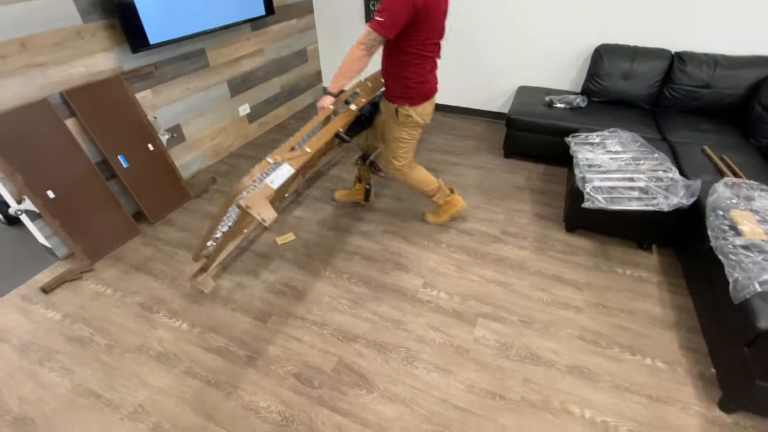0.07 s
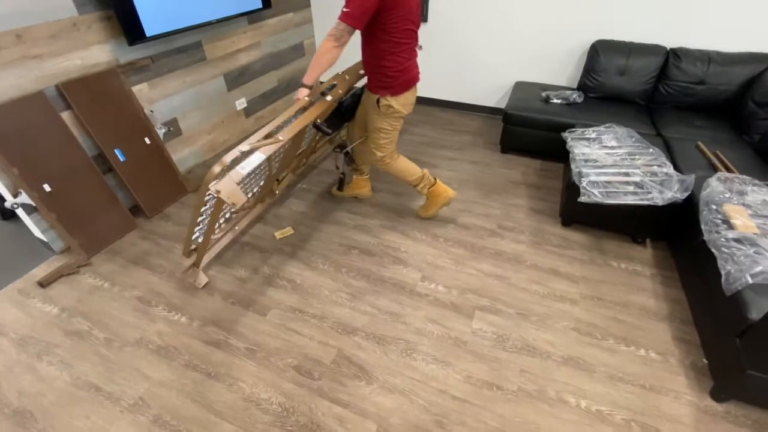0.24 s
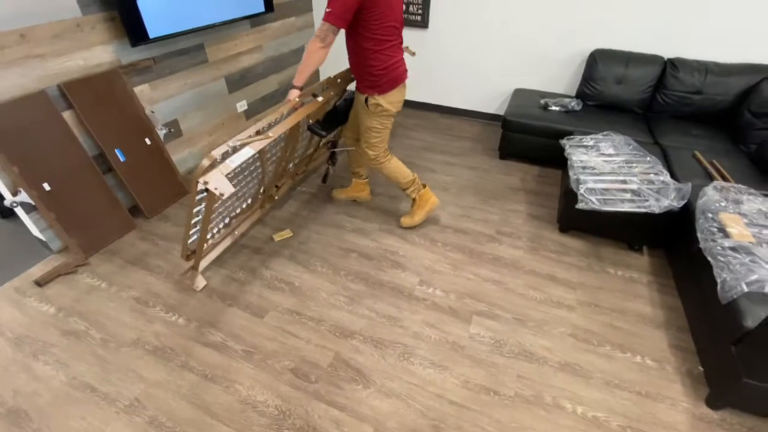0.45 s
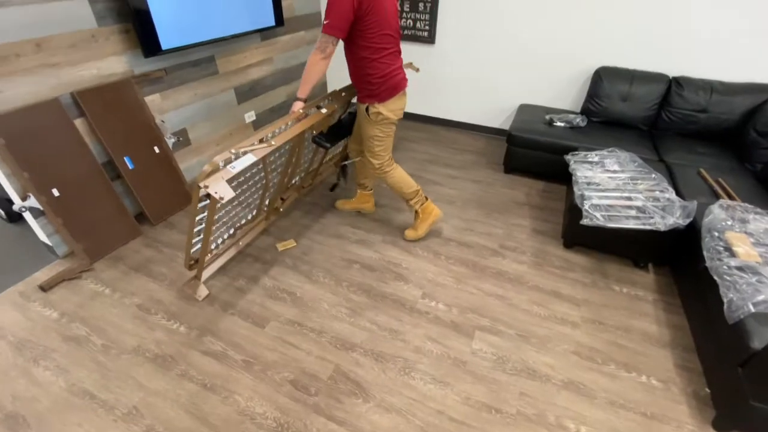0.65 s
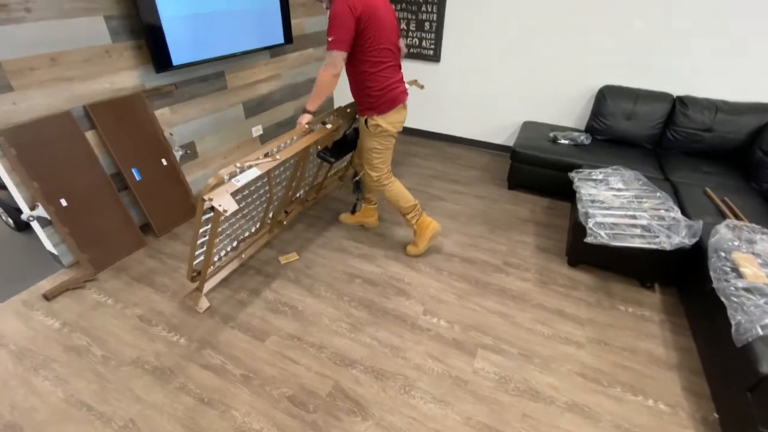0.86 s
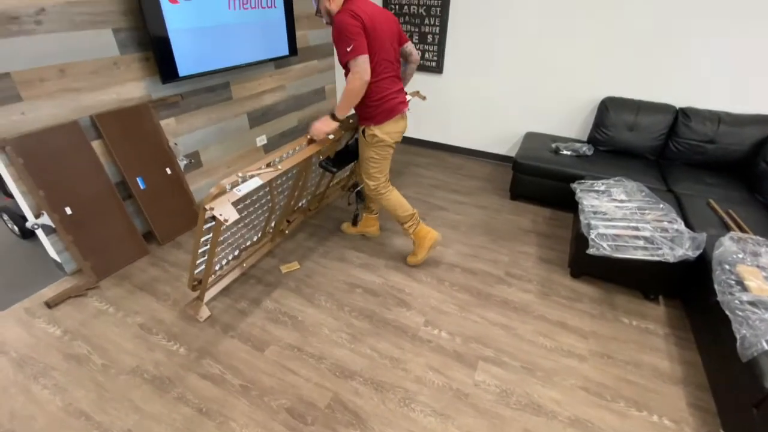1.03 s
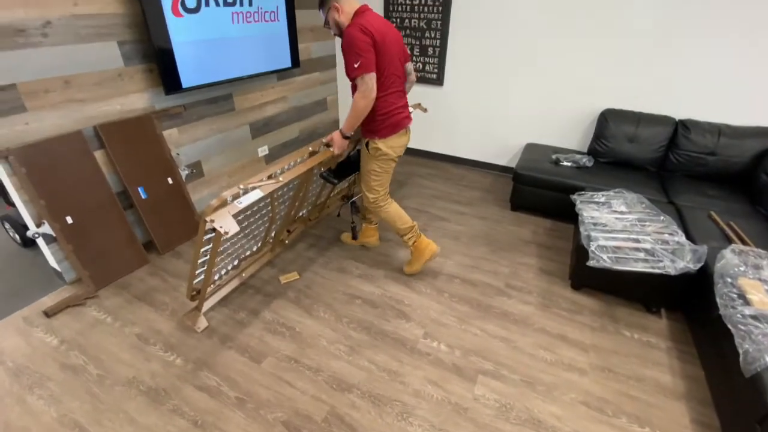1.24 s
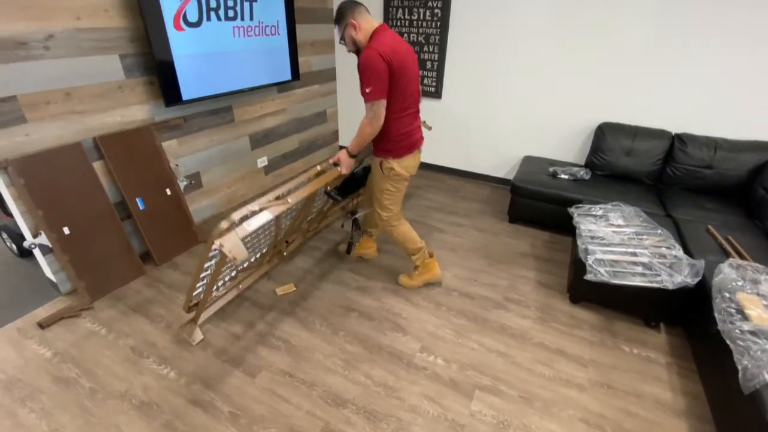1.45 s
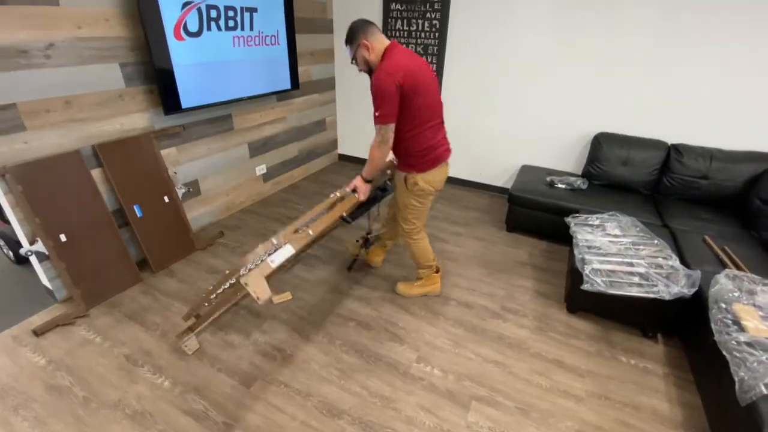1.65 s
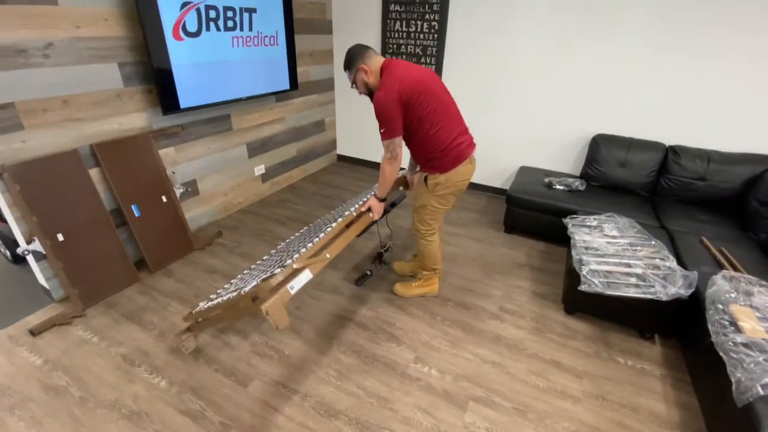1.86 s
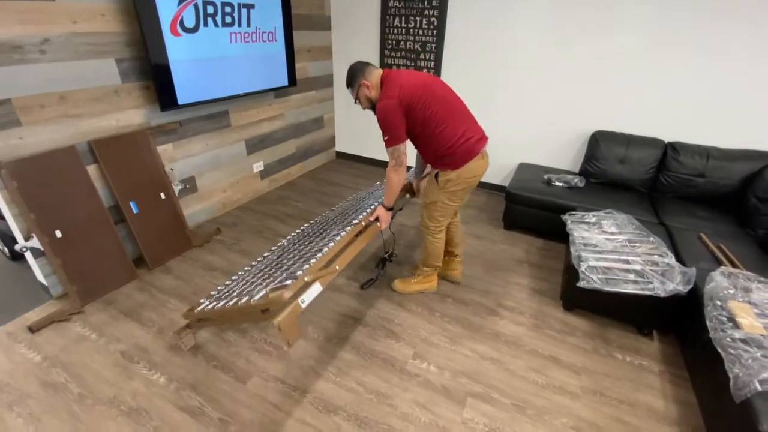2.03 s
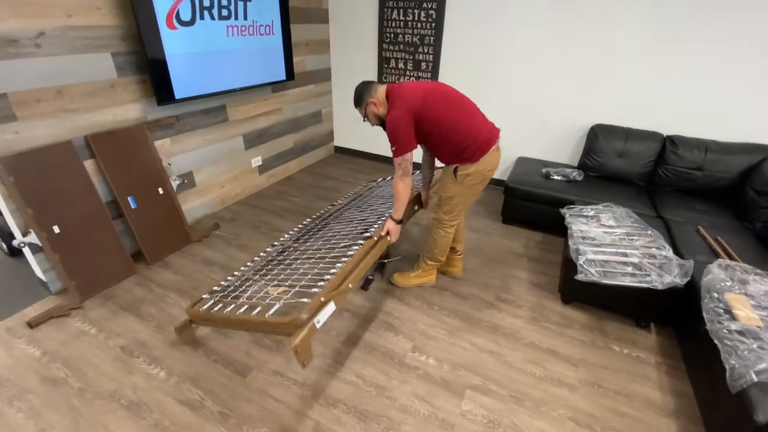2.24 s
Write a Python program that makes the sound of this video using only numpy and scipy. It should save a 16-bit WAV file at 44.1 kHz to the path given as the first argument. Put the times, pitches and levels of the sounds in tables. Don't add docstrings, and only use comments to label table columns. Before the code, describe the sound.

Steel bed frame handled indoors: a sharp, bright clash of springs and latch, scattered knocks and dull floor thuds, a brief quiet, then chattering links and a final leg knock, picked up in stereo in a lightly reverberant room.

```python
import sys
import numpy as np
from scipy import signal
from scipy.fft import rfft, irfft, next_fast_len
from scipy.io import wavfile
from scipy.ndimage import uniform_filter1d

SR = 44100
rng = np.random.default_rng(int(sys.argv[2]) if len(sys.argv) > 2 else 0)


def bounce(signal):
    frames = np.transpose(np.atleast_2d(signal))
    limited = np.clip(frames, -1, 1)
    pcm = np.round(limited * 32767).astype(np.int16)
    wavfile.write(sys.argv[1], SR, pcm)


def attenuation_scalar(level_db):
    decades = np.asarray(level_db, float) / 20
    return 10 ** decades


N = 101429


def along(table, hz):
    table = np.array(table, float)
    return np.interp(np.log(np.maximum(hz, 1)), np.log(table[:, 0]), table[:, 1])


def unit(x):
    return x / np.sqrt(np.sum(x ** 2) + 1e-18)


def add(track, at_s, sound):
    i = int(at_s * SR)
    track[i:i + len(sound)] += sound[:N - i]


def highpass(x, cutoff_hz):
    return signal.sosfilt(signal.butter(2, cutoff_hz, "high", fs=SR, output="sos"), x)


def rings(hz, t60_s):
    t = np.arange(int(min(t60_s.max() * 0.8, 0.2) * SR)) / SR
    fade = np.exp(-np.log(1000) * t / np.clip(t60_s, 0.005, 0.25)[:, None])
    return np.sin(2 * np.pi * np.outer(hz, t)) * fade


# pitch_hz, level_db (per Hz)
AIR_SPECTRUM = [(18, -55), (30, 0.5), (82, 2.5), (138, -4.5), (229, 2), (428, -6.5), (1790, -26),
                (2020, -24), (12000, -43.5), (15700, -33), (16300, -100)]


def air():
    hz, out = np.fft.rfftfreq(N, 1 / SR), np.zeros(N)
    shape = attenuation_scalar(along(AIR_SPECTRUM, hz))
    shape /= np.sqrt(np.mean(shape ** 2))
    for low_hz in 36 * 2.0 ** np.arange(9):
        steps = np.repeat(rng.standard_normal(N // 4000 + 1), 4000)
        waver_db = 1.5 * uniform_filter1d(steps, 4000)[:N]
        in_band = (hz >= low_hz) & (hz < 2 * low_hz)
        band = irfft(rfft(rng.standard_normal(N)) * shape * in_band, N)
        out += band * attenuation_scalar(waver_db)
    return out * attenuation_scalar(-56)


def room(x):
    low_t60_s, treble_t60_s, onset_s, level_db = 0.45, 0.31, 0.0059, -5
    t = np.arange(SR // 2) / SR
    noise = rng.standard_normal(len(t))
    low = signal.sosfilt(signal.butter(1, 2500, fs=SR, output="sos"), noise)
    tail = low * attenuation_scalar(-60 * t / low_t60_s) + (noise - low) * attenuation_scalar(-60 * t / treble_t60_s)
    tail = attenuation_scalar(level_db) * unit(tail * (1 - np.exp(-t / onset_s)))
    return signal.fftconvolve(x, tail)[:N]


# start_s, level_db, pitch_hz, t60_s
FLOOR_THUDS = [(0, -50, 302, 0.23), (0.089, -55.5, 234, 0.24), (0.241, -48, 205, 0.13),
               (0.292, -41, 313.6, 0.1), (0.465, -40, 363, 0.095), (0.487, -47, 207.6, 0.2),
               (0.591, -46, 347, 0.23), (.575, -46, 802, 0.061), (0.718, -42.5, 187, 0.051),
               (0.809, -56, 226, 0.13), (1.445, -47, 164.5, 0.43), (1.617, -40, 267, 0.1),
               (1.629, -42.5, 307, 0.089), (1.736, -47.5, 230, 0.065)]


def thuds():
    out = np.zeros(N)
    for start_s, level_db, pitch_hz, t60_s in FLOOR_THUDS:
        hz = pitch_hz * np.array([0.62, 0.85, 1, 1.2, 1.55])
        mode_db = np.array([-39, 6.0, 12.5, 12, -1.5]) + 2 * rng.standard_normal(len(hz))
        ring = attenuation_scalar(mode_db) @ rings(hz, t60_s * pitch_hz / hz)
        add(out, start_s, attenuation_scalar(level_db) * np.sqrt(0.017 * SR) * unit(ring))
    return out


# start_s, level_db
STRAP_TICKS = [
    (.0195, -49),
    (.0265, -55),
    (.0295, -48),
    (.0375, -58),
    (.0455, -51),
    (.0495, -46),
]


def ticks():
    out, t = np.zeros(N), np.arange(-64, 64) / SR
    click = 3 * np.cos(2 * np.pi * 7000 * t) * np.exp(-(t / 0.00012) ** 2)
    for start_s, level_db in STRAP_TICKS:
        add(out, start_s, attenuation_scalar(level_db) * click)
    return out


def part(modes, part_blows):
    hz, mode_db, t60_s = np.array(modes).T
    out = np.zeros(N)
    for start_s, level_db, length_s in part_blows:
        chance = rng.standard_normal((len(hz), 40))
        ring = rings(hz * (1 + 0.00037 * chance[:, 0]), t60_s)
        flutter = uniform_filter1d(np.repeat(chance, 300, axis=1), size=300, axis=1)
        flutter_db = 3 * flutter[:, :ring.shape[1]]
        rise = 1 - np.exp(-np.arange(ring.shape[1]) / SR / max(length_s, 0.0003))
        gain = attenuation_scalar(mode_db) * np.sign(chance[:, 1])
        sound = gain @ (ring * attenuation_scalar(flutter_db)) * rise
        add(out, start_s, attenuation_scalar(level_db) * np.sqrt(0.027 * SR) * unit(sound))
    return out


# pitch_hz, level_db, t60_s
LATCH_MODES = [(1960, -2, .06), (2063, 0, .06), (2208, 0, .06), (2590, 0, .06), (2763, -5, .12),
               (3770, -2, .05), (4357, -2, .05), (4700, -14, .05), (5040, -4, .05), (6720, -5, .04)]
# start_s, level_db, length_s
LATCH_HITS = [
    (.2455, -32, .003),
    (.268, -32, .003),
]


def latch():
    return part(LATCH_MODES, LATCH_HITS)


# pitch_hz, level_db, t60_s
HASP_MODES = [(8746, 0, .05), (9834, -3, .16), (11540, -9, .12), (12130, -1, .1), (14546, -9, .1)]
# start_s, level_db, length_s
HASP_HITS = [
    (0.243, -31, 0.00043),
]


def hasp():
    return part(HASP_MODES, HASP_HITS)


# pitch_hz, level_db, t60_s
TUBE_MODES = [(457, -5, 0.087), (699, 6, 0.031), (835, -4, 0.044), (853, 4, 0.042), (1050, -7.5, 0.076),
              (1260, -1, 0.066), (1480, -31, 0.042)]
# start_s, level_db, length_s
TUBE_HITS = [
    (.4445, -41, 0.0005),
    (1.584, -51, 0.0005),
    (.458, -44, .002),
]


def tube():
    return part(TUBE_MODES, TUBE_HITS)


# pitch_hz, level_db, t60_s
BAR_MODES = [(1782, 0, .09), (2347, -8, .1), (2745, 0, .09), (4151, -5, .1), (4942, -9, .08),
             (5696, -5, .07), (6535, -8, .08)]
# start_s, level_db, length_s
BAR_HITS = [
    (0.572, -37, .003),
    (.586, -42.5, 0.0021),
]


def bar():
    return part(BAR_MODES, BAR_HITS)


# pitch_hz, level_db, t60_s
PIN_MODES = [(2960, -4, .04), (3060, -2, .03), (3165, 0, .035), (3290, -3, .03), (3480, -6, .04),
             (5000, -14, .02), (6600, -18, .02)]
# start_s, level_db, length_s
PIN_HITS = [
    (0.7157, -38, 0.0003),
    (.727, -44, 0.0009),
    (.735, -46, .001),
    (0.772, -49, 0.001),
    (.798, -57, .002),
    (.85, -61, .002),
]


def pin():
    return part(PIN_MODES, PIN_HITS)


# pitch_hz, level_db, t60_s
BRACE_MODES = [(715, -3, .07), (1270, -2, .06), (1450, -2, .06), (1652, -3, .06), (1825, 0, .06),
               (2335, -5, .05), (2555, -6, .05), (4860, -6, .06), (6500, -12, .04)]
# start_s, level_db, length_s
BRACE_HITS = [
    (1.2255, -46, 0.003),
    (1.238, -48, 0.0015),
    (1.25, -45, 0.0021),
    (1.265, -54, 0.0029),
    (1.285, -65, 0.0019),
]


def brace():
    return part(BRACE_MODES, BRACE_HITS)


# pitch_hz, level_db, t60_s
LEG_MODES = [(872, -5, .1), (1010, -5, .1), (1270, -2, .08), (1437, 0, .12), (1560, -3, .08), (1970, 0, .1),
             (2250, -1, .07), (2584, -5, .1), (3190, -4, .08)]
# start_s, level_db, length_s
LEG_HITS = [
    (2.019, -39, .0004),
    (2.033, -46.5, 0.0033),
    (2.043, -44.5, 0.0022),
    (2.078, -52.5, 0.0034),
]


def leg():
    return part(LEG_MODES, LEG_HITS)


def contacts(rate_per_s, count):
    size_db = 3.5 * np.minimum(rng.exponential(size=count), 3)
    struck = rng.random(count) < rate_per_s / SR
    hit = struck * rng.choice([-1, 1], count) * attenuation_scalar(size_db)
    return hit / np.sqrt(np.mean(hit ** 2))


# start_s, level_db
FRAME_SHAKE = [(0, -53.5), (.14, -57.5), (.22, -45.5), (.44, -46), (.54, -49.5), (.7, -51), (.95, -54.5),
               (1.05, -63.5), (1.198, -63.5), (1.4, -56.5), (1.57, -54.5), (1.62, -42.5), (1.8, -43.5),
               (2.001, -45.5), (2.1, -48.5), (2.15, -74), (2.22, -87)]


def shaken(rate_per_s, ring, level_db, steepness=1):
    start_s, shake_db = np.array(FRAME_SHAKE).T
    shake_db = np.interp(np.arange(N) / SR, start_s, shake_db)
    level = attenuation_scalar(steepness * (shake_db + 45) - 45 + level_db)
    return signal.fftconvolve(contacts(rate_per_s, N) * level, unit(ring))[:N]


# pitch_hz, level_db, t60_s
LINK_MODES = [(1447, -4, .05), (1890, -1, .06), (2730, -1, .05), (2990, -2, .05), (3170, -3, .05),
              (3330, 0, .06), (3500, -5, .04), (4890, -13, .04), (5820, -12, .04), (6480, -16, .03),
              (6840, -14, .03)]
# start_s, level_db, length_s
LINK_HITS = [(1.41, -64, 0.0089), (1.4495, -50, 0.00067), (1.461, -52, 0.0027), (1.756, -44, 0.0018),
             (1.502, -52, 0.0025), (1.562, -54, 0.0058), (1.584, -36, 0.00069), (1.605, -38.5, 0.0015),
             (1.658, -38.5, 0.0016), (1.769, -48, 0.012), (1.861, -42, 0.005), (1.959, -45.5, 0.0051),
             (1.69, -51, .003), (1.738, -45, 0.0025), (1.816, -45, .002), (1.92, -55, 0.0025),
             (1.988, -49, 0.0031), (2.078, -45.5, 0.0024), (2.112, -57, 0.0058), (2.142, -63, 0.0019)]


def links():
    hz, mode_db, t60_s = np.array(LINK_MODES).T
    out = part(LINK_MODES, LINK_HITS)
    for stray, tint in rng.standard_normal((5, 2, len(hz))):
        ring = attenuation_scalar(mode_db + 2.65 * tint) @ rings(hz * (1 + 0.0173 * stray), 0.55 * t60_s)
        out += shaken(90, ring, -10, steepness=2.77)
    return out


SPOTS = 5
# start_s, level_db, length_s, tilt_db (per octave)
DECK_KNOCKS = [(0, -49, 0.025, -8.5), (0.086, -53, 0.023, -7), (0.446, -42, 0.037, -8.5),
               (0.156, -47, 0.061, -5), (0.235, -32, 0.0089, 1.5), (0.2436, -25.5, 0.011, 1.5),
               (0.26, -28, 0.018, 1.5), (0.272, -29, 0.016, 1.5), (.295, -37, 0.032, -0.5),
               (0.458, -41, 0.1, 1.5), (0.567, -36.5, 0.017, 1.5), (0.586, -37, 0.031, 2),
               (.704, -50, 0.01, 8), (0.714, -38.5, 0.0038, 0), (.727, -42, .01, 0.5),
               (0.775, -52.5, 0.026, 1.5), (1.2224, -46, 0.036, -3.5), (1.447, -50, 0.016, -1),
               (1.511, -60.5, 0.0087, -8), (1.571, -56, 0.023, -5), (1.584, -32, 0.0088, -1.5),
               (1.601, -34.5, 0.016, -0.5), (1.6566, -35.5, 0.002, 3), (1.667, -38, 0.0065, -0.5),
               (1.739, -42, 0.015, -1.5), (1.812, -41, 0.018, -2.5), (1.856, -42.5, 0.077, -4),
               (1.954, -42, 0.013, -2), (2.0194, -42, 0.002, -0.5), (2.03, -34.5, 0.013, -1)]


def blows(ring, gains):
    out, t = np.zeros(N), np.arange(SR // 8) / SR
    first_contact = 5.5 * (t == 8 / SR)
    for (start_s, level_db, length_s, _), spots in zip(DECK_KNOCKS, gains):
        x = t / max(length_s, 0.001)
        shape = (1 - np.exp(-x / 0.24)) * np.exp(-x ** 2)
        sound = 0
        for gain in spots:
            flurry = contacts(4000 / SPOTS, len(t)) * shape + first_contact
            sound = sound + signal.fftconvolve(flurry, unit(gain @ ring))
        add(out, start_s, attenuation_scalar(level_db) * np.sqrt((length_s + 0.018) * SR) * unit(sound))
    return out


# pitch_hz, level_db (per Hz)
DECK_SPECTRUM = [(400, -9), (600, -12.5), (900, -5.5), (2000, 2), (3300, 1), (6500, -4), (12000, -12),
                 (14000, -15.5), (15000, -23)]


def deck():
    wires = 800
    place = np.linspace(0, 1, wires) ** 0.6 + 0.001 * rng.standard_normal(wires)
    hz = 400 * 40 ** place
    ring = rings(np.minimum(hz, 15800), 0.028 * (hz / 3000) ** -0.2)
    spacing_hz = np.abs(np.gradient(uniform_filter1d(hz, size=15)))
    base_db = along(DECK_SPECTRUM, hz) + 10 * np.log10(spacing_hz + 1)

    def spot_gains(tilt_db):
        scatter_db = 3 * rng.standard_normal((SPOTS, wires))
        sign = rng.choice([-1, 1], (SPOTS, wires))
        return sign * attenuation_scalar(base_db + tilt_db * np.log2(hz / 3000) + scatter_db)

    out = blows(ring, [spot_gains(tilt_db) for *_, tilt_db in DECK_KNOCKS])
    for gain in spot_gains(-1.86):
        out += shaken(3500 / SPOTS, gain @ ring, -8.5)
    return out


# pitch_hz, likeness (0-1)
CHANNEL_LIKENESS = [(100, 0.9), (400, 0.63), (1000, 0.23), (2000, 0), (4500, 0.14), (9000, 0.08)]
# pitch_hz, level_db (left minus right)
STEREO_LEAN = [(300, -2), (1000, 1.5), (2400, -2), (5200, 4), (7500, 4), (9000, -1), (10000, -2)]


def stereo(same, other, direct):
    size = next_fast_len(N + 4096)
    hz = np.fft.rfftfreq(size, 1 / SR)
    other = rfft(other, size) + 0.4j * rfft(direct, size)
    likeness = np.clip(along(CHANNEL_LIKENESS, hz), 0, 1)
    left_leads_s = 0.00001
    turn = attenuation_scalar(along(STEREO_LEAN, hz) / 2) * np.exp(1j * np.pi * hz * left_leads_s)
    mid = np.sqrt((1 + likeness) / 2) * rfft(same, size)
    side = np.sqrt((1 - likeness) / 2) * other
    return np.array([irfft((mid + side) * turn, size)[:N], irfft((mid - side) / turn, size)[:N]])


def scene():
    steel = latch() + hasp() + tube() + bar() + pin() + brace() + leg() + links() + deck()
    dry = highpass(steel, 300) + highpass(thuds(), 90)
    spread = rng.standard_normal(800) * np.exp(-np.arange(800) / 200)
    scatter = irfft(np.exp(1j * np.angle(rfft(spread))))
    scattered = signal.fftconvolve(dry, scatter)[:N]
    click = ticks()
    same = dry + room(dry) + air() + click
    other = 0.72 * scattered + room(dry) + air() + 0.5 * click
    return stereo(same, other, dry)


def top_cut(x):
    return signal.sosfilt(signal.butter(12, 16000, fs=SR, output="sos"), x)


def record(dry):
    size = next_fast_len(N)
    hz = np.fft.rfftfreq(size, 1 / SR)
    left, right = rfft(dry, size)
    sign = np.where((hz > 12350) & (hz < 14500), -1, 1)
    right = np.where(hz > 9800, sign * left, right)
    joined = irfft([left, right], size)[:, :N]
    return top_cut(joined)


dry = scene()
out = record(dry)
bounce(out)
```